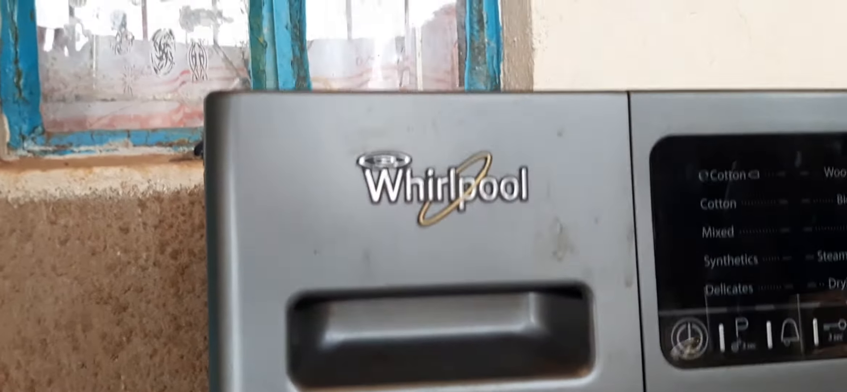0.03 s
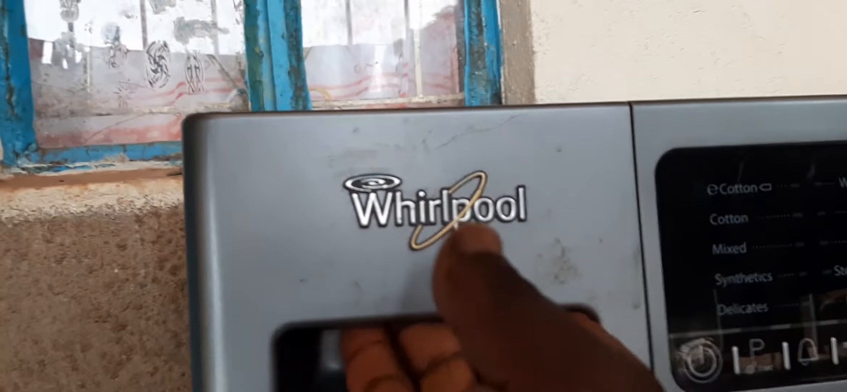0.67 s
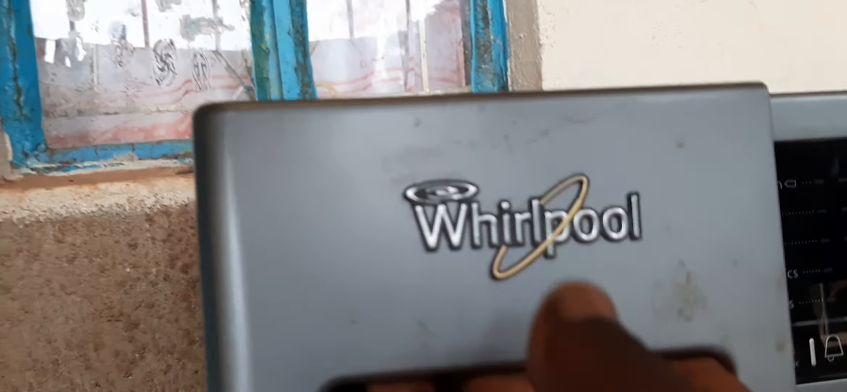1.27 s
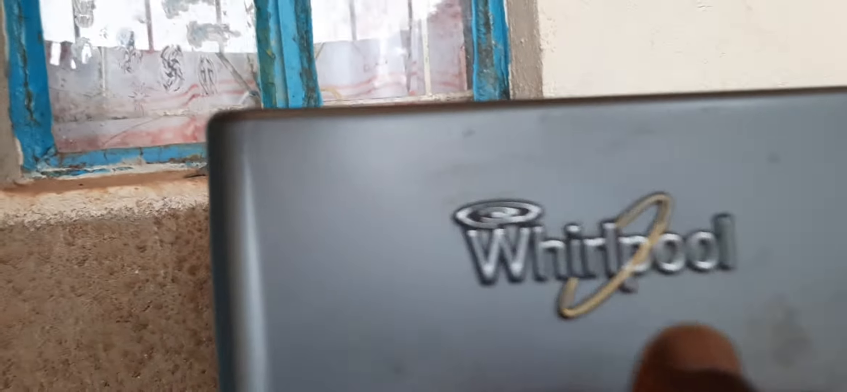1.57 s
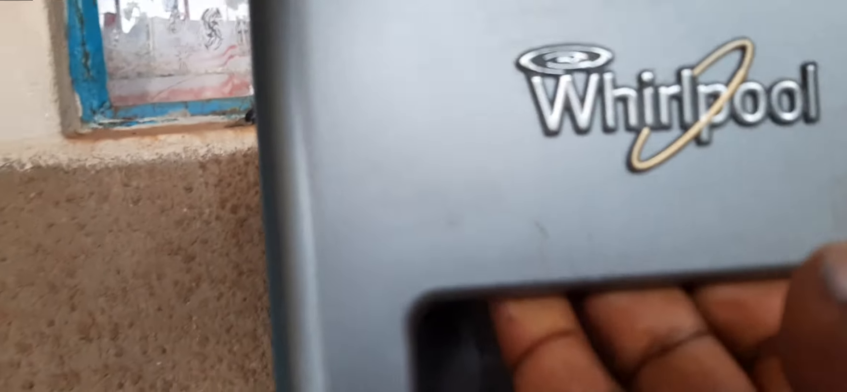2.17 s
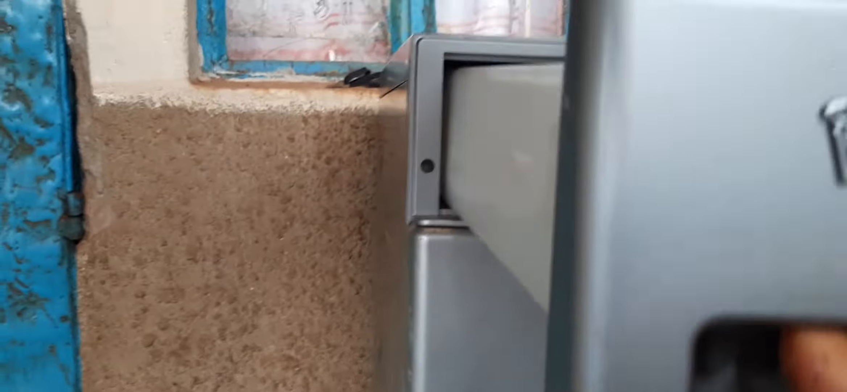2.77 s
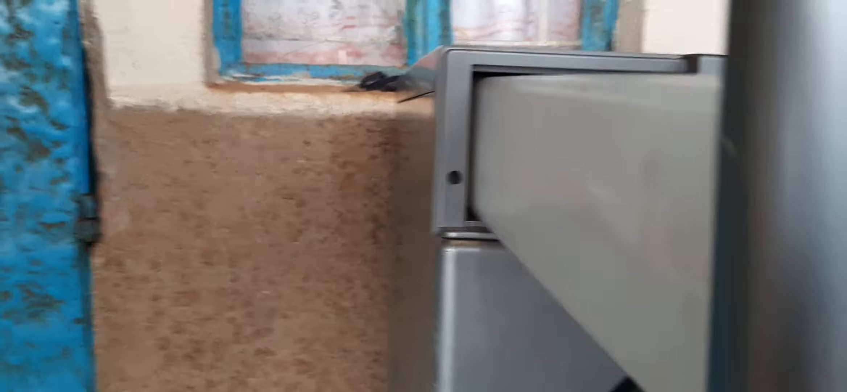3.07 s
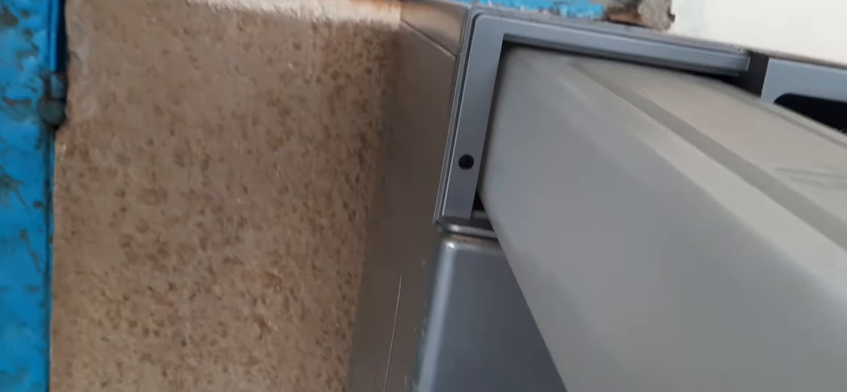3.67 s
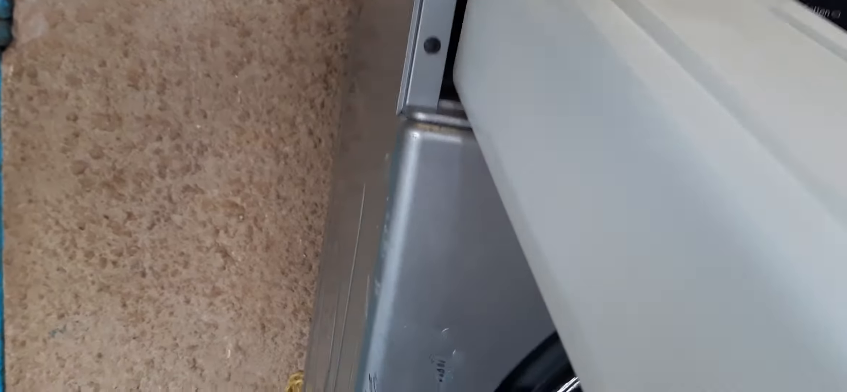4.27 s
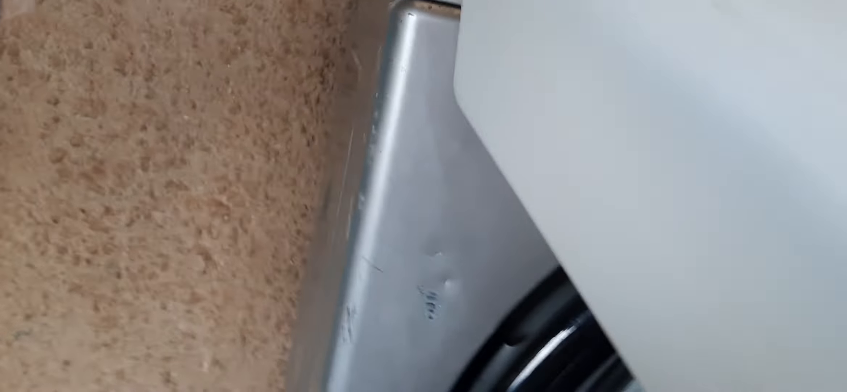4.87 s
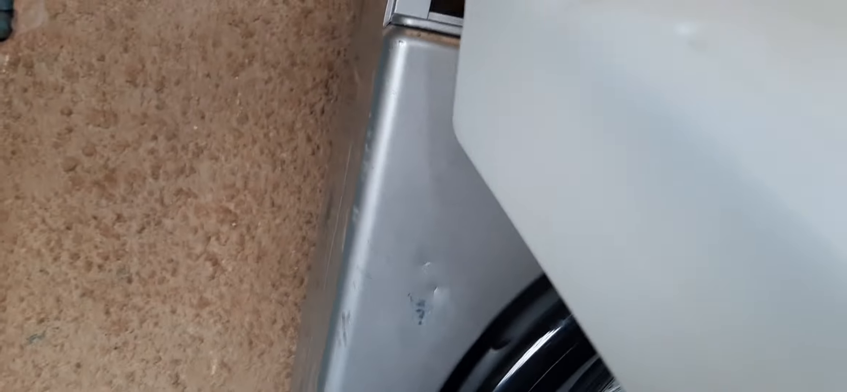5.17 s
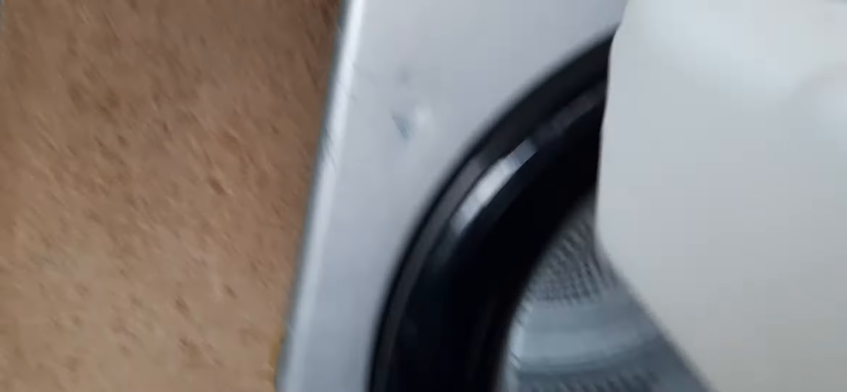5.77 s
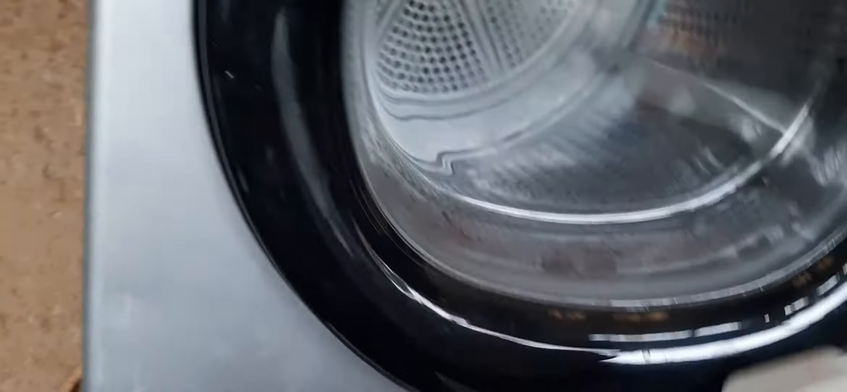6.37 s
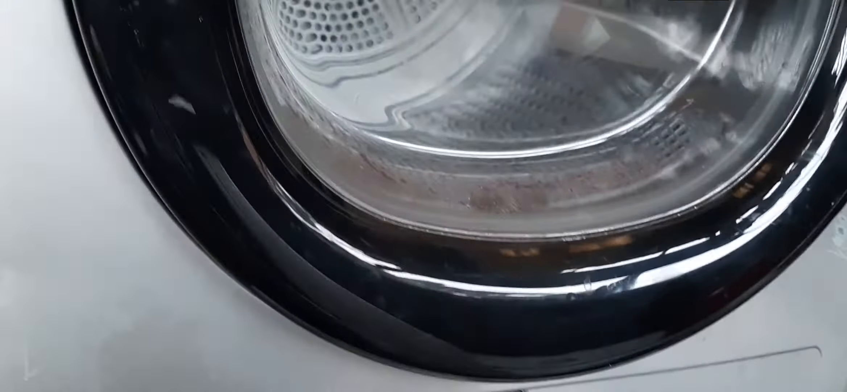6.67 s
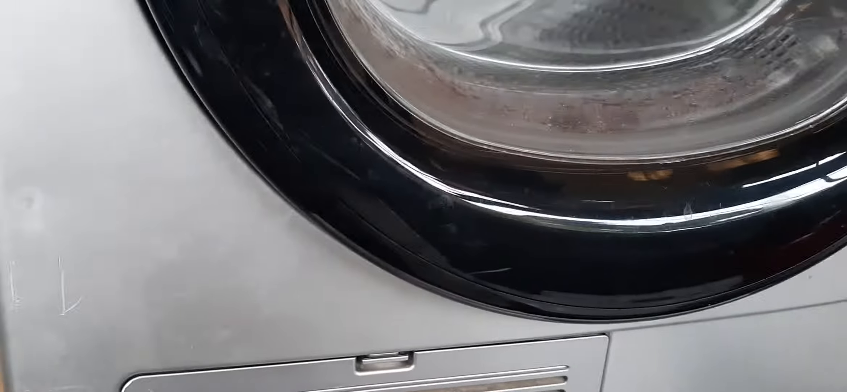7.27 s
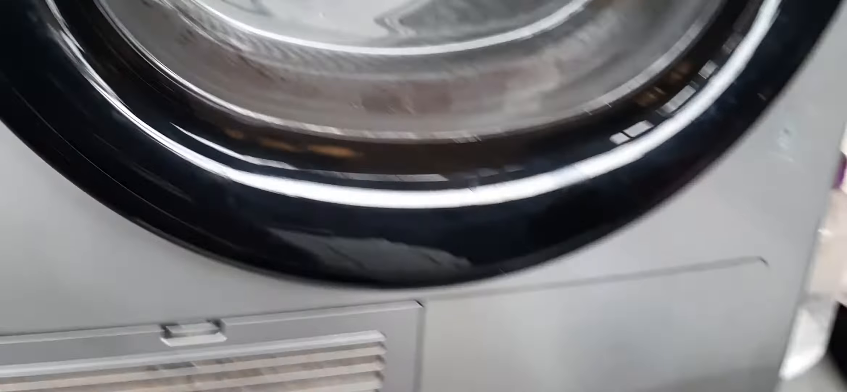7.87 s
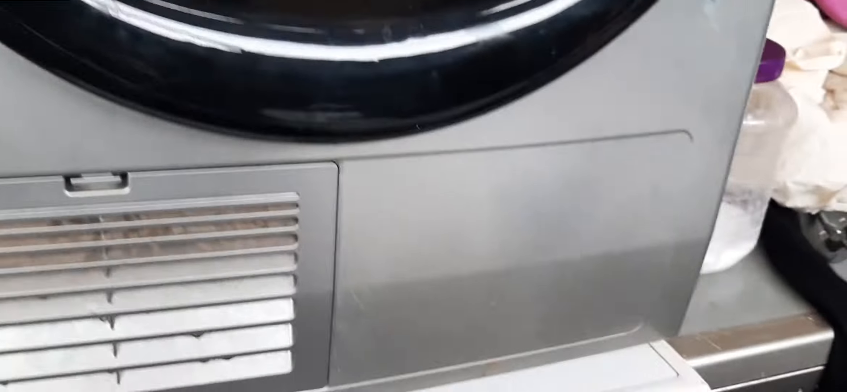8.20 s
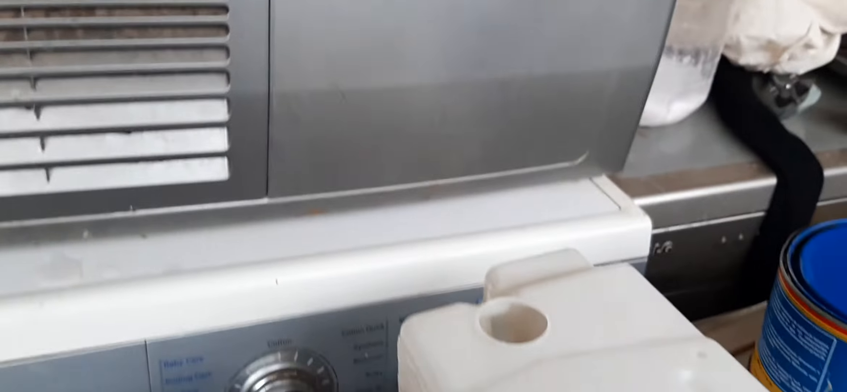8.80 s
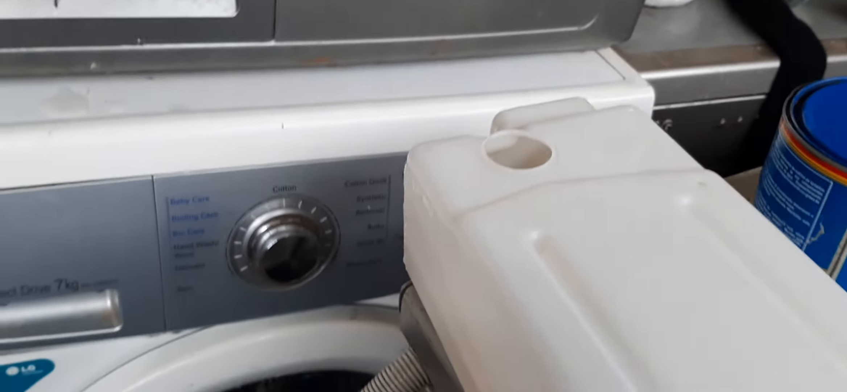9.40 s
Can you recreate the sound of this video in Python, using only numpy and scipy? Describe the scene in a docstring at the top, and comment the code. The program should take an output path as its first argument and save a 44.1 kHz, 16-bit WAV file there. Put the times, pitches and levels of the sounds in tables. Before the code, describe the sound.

A plastic water tank scrapes and knocks out of a dryer, sloshes and spills a little, then lands with a hollow boom.

```python
"""The plastic water tank of a tumble dryer is pulled from its bay in a small, hard-walled room.
First fingertips slip on the handle. Then the tank scrapes along its rails and knocks in the hollow
cabinet; its stop tab snaps over a catch and the thin panels shudder. Next, as it is carried away,
its water sloshes and bubbles, and some splatters on the floor. Last, it is set down with a boom
on the lid of a washing machine, where the water inside sloshes on with a low rumble."""
import sys
import numpy as np
from scipy import signal
from scipy.fft import rfft, irfft
from scipy.io import wavfile

SR = 44100
rng = np.random.default_rng(int(sys.argv[2]) if len(sys.argv) > 2 else 0)


def transcribe(u):
    """Save the signal u as a 16-bit wav file named by the first command-line argument.

    u: samples, shape (n,) or (channels, n), limited to [-1, 1]; the rate is SR.
    q: integer samples, one column per channel.
    """
    v = np.clip(np.atleast_2d(u).T, -1, 1)
    q = np.round(v * 32767).astype(np.int16)
    wavfile.write(sys.argv[1], SR, q)


N = 416304
TIME = np.arange(N) / SR
RING_TIME = np.arange(SR * 3 // 4) / SR  # the clock for one short sound, in seconds

# The tank hits its bay, and later the washer lid.
# Each row: start in seconds, thud level in dB, clack level in dB, brightness in Hz.
BAY_KNOCKS = [(.26, -52.5, -53.5, 2060), (.284, -45, -59.5, 12000), (.46, -57, -47, 1010),
              (.557, -67, -46.5, 1320), (.864, -59, -47.5, 1600), (.937, -54, -35, 1600),
              (.987, -51, -31, 990), (1.099, -58, -35, 1680), (1.6, -50, -32, 1760),
              (1.919, -34, -27.5, 1850), (1.999, -54, -31.5, 1370), (2.07, -62, -33.5, 1210),
              (2.62, -56, -37.5, 5800), (3.619, -20, -21, 2483), (3.652, -13.5, -24, 710),
              (3.741, -22.5, -22, 600), (3.892, -36.5, -61, 588), (4.061, -23.5, -29.5, 900),
              (4.145, -30.5, -63, 600), (4.461, -79.5, -50, 14100), (4.553, -23, -26, 1070),
              (4.569, -19.5, -31, 2540), (4.73, -70, -42.5, 12000), (4.7615, -12, -23, 1302),
              (4.769, -11.5, -21, 600), (4.804, -33, -35.5, 7000), (4.822, -31.5, -36, 2440),
              (4.907, -29.5, -35.5, 700), (4.995, -41, -46, 1460)]
LID_KNOCKS = [(7.953, -27, -25, 2800), (7.958, -21, -20, 1580), (7.967, -12, -22, 873),
              (8.01, -20.5, -31, 1750), (8.602, -36.5, -70, 900), (8.943, -58.5, -50.5, 2510),
              (9.05, -61, -50.5, 9000)]
# The hollow notes (modes) of the tank in its bay and on the lid.
# Each row: pitch in Hz, level in dB, seconds to fade by 60 dB (called t60 below).
BAY_MODES = [(64.4, -18, 1), (87.3, -9.5, 0.63), (110.4, -9.5, 0.31), (128.6, -3.5, 0.39),
             (147.7, -6.5, 0.78), (180, 4.5, 0.14), (224.8, 2, 0.37), (265.4, 0.5, 0.41), (288.3, -5, 0.47),
             (324, -12.5, .25), (369, -12.5, 0.17), (447, -10.5, 0.5), (507, -10, 0.6), (568, -9.5, 0.18),
             (642, -17.5, 0.22), (763, -21, 0.27), (821, -11.5, 0.25)]
LID_MODES = [(84.7, 7.5, 0.62), (130.9, 12, 0.47), (161, 3, 0.23), (242, 14.5, 0.33), (270, 4, 0.31),
             (322, 6.5, 0.38), (374, -2, 0.46), (487, 6.5, 0.28), (635, -10, 0.21), (700, -6.5, 0.3),
             (910, -18, 0.31)]

# Movements that swell and die away.
# Each row: peak time in seconds, rise in seconds, fall in seconds, level in dB.
PANEL_SHUDDERS = [(.31, .03, 0.14, -56.5), (3.68, .08, 0.33, -39), (4.12, 0.12, 0.088, -36.5),
                  (4.78, .3, .44, -34)]  # the tank's weight rocks on the cabinet panels
TUGS = [(.9, 0.048, 0.12, -43.5), (1.08, 0.29, .3, -39.5), (1.54, .2, 0.3, -36.5),
        (2.04, 0.37, 0.42, -40.5), (2.62, .45, .24, -41), (3.0, 0.17, 0.11, -37), (3.26, 0.17, .18, -57),
        (3.63, 0.098, 0.29, -39.5), (3.8, 0.14, 0.074, -42.5), (4.1, 0.12, .13, -44),
        (4.36, 0.18, 0.25, -53), (4.56, 0.099, 0.047, -38), (4.77, 0.27, .13, -38.5),
        (5.21, 0.22, 0.077, -58)]  # the tank slides along its rails
WATER_SWINGS = [(6.19, 0.1, 0.17, -59.5), (6.62, 0.047, 0.058, -50), (6.72, 0.13, 0.12, -45.5),
                (6.95, 0.03, 0.046, -40), (7.04, 0.35, 0.19, -32.5), (7.22, 0.054, 0.14, -48.5)]  # water swings inside the carried tank
GUSHES = [(6.33, .022, .06, -43.5), (6.43, 0.024, 0.042, -51), (6.7, 0.69, 0.52, -57.5),
          (7.39, 0.08, 0.12, -38), (7.55, 0.22, .26, -38)]  # spilled water spatters on the floor
LID_SLOSHES = [(8.42, 0.23, 0.32, -51), (8.62, .02, 0.12, -42.5), (8.98, 0.29, 0.26, -58),
               (9.38, 0.23, 0.25, -65.5)]  # water sloshes in the tank as it stands on the lid

# Fingertips slip in the handle. Each row: start in seconds, length in seconds, level in dB.
FINGER_SLIPS = [(0.437, 0.063, -44), (0.548, .02, -49.5), (0.598, 0.13, -55.5)]
# Single air pockets close in the water. Each row: start in seconds, level in dB, pitch in Hz.
PLOPS = [(6.6133, -42.5, 1500), (6.6417, -43, 2530), (6.6781, -35.5, 1510), (6.69, -37, 2900),
         (6.7403, -41, 1610), (6.782, -35, 3050), (6.8405, -35, 1530), (6.8818, -35, 1530),
         (6.949, -37, 2070), (7.033, -37, 2660), (7.048, -45, 1220), (7.052, -39, 3870),
         (7.1246, -47, 1470), (7.163, -43, 3600), (7.463, -30.5, 2970), (7.683, -32, 3040),
         (8.29, -56.5, 1750), (8.3877, -53, 1580), (8.512, -46, 1610), (8.597, -37, 1505)]
# Drops land. Each row: start in seconds, slap level in dB, ring level in dB, ring pitch in Hz.
DROPS = [(6.422, -68, -48, 4170), (6.685, -48, -42, 4200), (6.772, -62, -48, 3280), (7.3, -50.5, -67, 2000),
         (7.322, -38.5, -55, 5500), (7.3434, -32, -57, 4510), (7.361, -29.5, -33, 3480),
         (7.393, -52, -33, 3750), (7.463, -27, -28, 3360), (7.515, -61, -36, 2700),
         (7.5417, -28, -33, 2800), (7.585, -56, -55.5, 2920), (7.622, -46.5, -41, 4500),
         (7.649, -40, -40, 5300), (7.682, -35.5, -30.5, 3060), (7.712, -42, -70, 2830),
         (8.074, -50, -64.5, 4760), (8.291, -64.5, -67, 4670), (8.485, -53.5, -84, 5000)]

# Pitches that the plastic shell and the room boost.
# Each row: centre in Hz, width in Hz, boost in dB.
SHELL_RESONANCES = [(228, 13, 4), (446, 23, 6.5), (605, 83, 3.5), (859, 92, 2.5), (982, 23, 1),
                    (1509, 100, 3.5), (2100, 39, 0), (2910, 600, 3.5), (4030, 100, 3)]
STANDING_WAVES = [(131, 44, 4), (382, 58, 2.5), (820, 200, 2)]

# A sound's colour is its mix of low and high pitches. Each row: frequency in Hz, gain in dB.
CLACK_COLOUR = [(60, -26.5), (200, 1), (500, -3), (1000, -3), (2000, -0.5), (4000, -6.5), (7000, -9.5),
                (11000, 2), (16000, 4)]  # the thin tank wall
FLEX_COLOUR = [(25, -30.5), (55, -10), (125, -2.5), (260, -3.5), (450, -10), (900, -17.5), (3000, -57)]  # bending panels
SCRAPE_COLOUR = [(29, -50.5), (50, -14.5), (220, -1.5), (371, -7), (433, -8.5), (545, -9.5), (991, -8),
                 (1510, -10), (1730, -19), (2020, -10), (5000, -30), (6500, -58.5), (11000, -120)]  # plastic rubbing on plastic
HISS_COLOUR = [(1500, -23), (3000, -1), (4500, -6), (7000, -3.5), (11000, -8), (16000, -8.5)]  # the fine hiss of that rubbing
GRIP_COLOUR = [(59, -10), (100, -9), (300, -14), (388, -2), (505, -8), (587, 3.5), (1130, -8), (1920, -13),
               (2190, -10.5), (9000, -48), (11700, -73), (19800, -120)]  # fingers on the hollow handle
GURGLE_COLOUR = [(35, -53), (60, -5), (113, -5.5), (237, 1), (471, 0), (642, 1), (1130, 1.5), (1500, 3),
                 (1950, -27), (3300, -120)]  # big bubbles
CHURN_COLOUR = [(400, -10), (1200, -6.5), (1550, -1), (2500, 0.5), (3500, -15), (7000, -16), (14000, -20)]  # the stirred water surface
SPLASH_COLOUR = [(400, -7), (1300, -11), (2500, 0.5), (4500, -2), (7000, 3.5), (11000, 4), (16000, 2)]  # water hitting the floor
RUMBLE_COLOUR = [(24, -36), (40, 4.5), (108, -19), (157, 7), (204, -9), (339, -1), (556, -28.5), (900, -40),
                 (1170, -41), (1980, -120)]  # low sloshing in the tank on the lid
AIR_COLOUR = [(18, -36), (30, -4.5), (141, -0.5), (512, -9.5), (600, -6.5), (988, -16), (1760, -12),
              (2540, -10.5), (2980, -24.5), (3980, -20), (4910, -27.5), (7670, -27), (8520, -29),
              (14400, -19.5), (16000, -13)]  # the steady background
PORT_COLOUR = [(20, 1), (7600, -2), (8600, -8.5), (9600, -9), (11000, 0), (16000, -2)]  # the microphone's small openings (ports)

# Where the tank is heard. Each row: time in seconds, left minus right in dB.
TANK_POSITION = [(0, 0), (3, 1), (3.6, -1), (4.6, -2), (5.2, -0.5), (6.3, 1), (7.9, 1.5), (9.4, 3.5)]
# How each pitch leans to one side. Each row: frequency in Hz, left minus right in dB.
STEREO_BALANCE = [(60, -7), (120, -3), (200, -1), (330, -3), (700, -2), (1300, -1.5), (2400, 8),
                  (4400, -2.5), (8000, 1.5), (15000, 4)]


def knocks(table, modes, clack_t60, wall_db, wall_t60, flex_db, flex_t60):
    """The shell clacks and the body booms. Each hit has its own brightness, from dull to sharp."""
    thuds, clacks = np.zeros(N), np.zeros(N)
    for start, thud_db, clack_db, bright_hz in table:
        strike = burst(clack_t60) + amp(wall_db) * burst(wall_t60)
        clack = colour(strike, CLACK_COLOUR, SHELL_RESONANCES)
        for cutoff_hz in (bright_hz, bright_hz * 1.18):
            clack = signal.lfilter(*signal.butter(1, min(cutoff_hz, SR / 3), fs=SR), clack)
        add(clacks, start, at_level(clack, clack_db))
        # The panels flex in many crowded modes between the strong ones.
        flex = colour(burst(flex_t60), FLEX_COLOUR)
        add(thuds, start, at_level(boom(modes), thud_db) + at_level(flex, thud_db + flex_db))
    return thuds, clacks


def boom(modes):
    """The hollow body rings. Shifting water and the spot struck change its notes a little each time."""
    out = 0
    for k, (hz, db, t60) in enumerate(modes):
        detune, weight = rng.standard_normal(2)
        pitch = hz * (1 + .008 * detune)
        tone = np.sin((2 * np.pi * pitch * RING_TIME).astype(np.float32))
        out = out + (-1) ** k * amp(db + 1.5 * weight) * tone * fade(t60)
    return out


def tab_snap():
    """The tank's stop tab springs over its catch with a hard, bright crack."""
    out = np.zeros(N)
    crack = burst(t60=.024) + amp(-23.5) * burst(t60=.25)
    tab_colour = [(1200, -38), (2600, 0), (4000, -2.5), (6500, -5), (9000, -10), (15000, -14)]
    tab = colour(crack, tab_colour, peaks=[(2900, 350, 8.7), (3840, 300, 4.4)])
    add(out, start=3.618, sound=at_level(tab, db=-19))
    return out


def panel_shudder():
    """The cabinet drums low while the tank rocks on the end of its rails."""
    low_band = signal.butter(2, [52, 95], "band", fs=SR, output="sos")
    drumming = unit(signal.sosfilt(low_band, rng.standard_normal(N)))
    return swells(PANEL_SHUDDERS, steepness=1.6) * drumming


def sliding():
    """Plastic catches and slips on plastic: the shell rings with it, and faster tugs hiss more."""
    speed = swells(TUGS, steepness=1.81)
    catching = flutter(per_s=40, depth_db=2)
    coarse_slips = grains(per_s=2700, spread_db=1.5) * catching
    fine_slips = grains(per_s=17000, spread_db=3) * catching
    scrape = unit(colour(coarse_slips, SCRAPE_COLOUR, SHELL_RESONANCES))
    hiss = unit(colour(fine_slips, HISS_COLOUR))
    return amp(2) * speed * scrape + speed ** 1.263 * hiss


def sloshing():
    """Water churns, and breaking waves fold in bubbles. It laps on after the tank is set down."""
    waves = swells(WATER_SWINGS, steepness=1.82)
    lapping = amp(-30.5) * swells(LID_SLOSHES, steepness=4.8) ** .47
    stir = amp(-16.5) * waves ** .64 + lapping
    breaking = np.minimum(stir / amp(-47), 1)  # gentle stirring makes little froth
    big = bubbles(139.5, 990, cycles=6.3, spread_db=2, count=4000)
    medium = bubbles(900, 3400, cycles=20, spread_db=4.2, count=1800)
    tiny = bubbles(2800, 6500, cycles=30, spread_db=5, count=1000)
    gurgle = unit(colour(big, GURGLE_COLOUR))
    froth = unit(colour(medium + amp(-5) * tiny, CLACK_COLOUR, SHELL_RESONANCES))  # through the wall
    churn = unit(colour(grains(per_s=2400, spread_db=3), CHURN_COLOUR))
    surface = breaking * froth + amp(-7) * churn
    out = amp(-2.5) * waves * gurgle + stir * surface
    for start, db, hz in PLOPS:
        add(out, start, at_level(bubble(hz, cycles=24, glide=.12), db - 2))
    return out


def spill():
    """Drops slap the floor, trap air that rings briefly, and scatter into mist and droplets."""
    out = np.zeros(N)
    spray = swells(GUSHES, steepness=1)
    for start, slap_db, ring_db, hz in DROPS:
        slap = burst(t60=.007) + amp(-19) * burst(t60=.1)
        add(out, start, at_level(colour(slap, SPLASH_COLOUR), slap_db))
        pocket_band = signal.butter(2, [hz / 1.24, min(hz * 1.41, SR / 3)], "band", fs=SR)
        ring = signal.lfilter(*pocket_band, burst(t60=.015))
        add(out, start, at_level(ring, ring_db))
        scatter = envelope(rise_s=.0053, fade_from_s=.0053, t60=.16)
        add(spray, start, amp(slap_db - 15) * scatter)
    mist = unit(colour(grains(per_s=2700, spread_db=1), SPLASH_COLOUR))
    droplets = unit(colour(grains(per_s=45, spread_db=2), SPLASH_COLOUR))
    return out + amp(-1) * spray * (mist + amp(-2) * droplets)


def fingers():
    """Fingertips stutter over the hollow handle."""
    pressure = np.zeros(N)
    for start, length_s, db in FINGER_SLIPS:
        add(pressure, start, amp(db) * envelope(rise_s=.016, fade_from_s=length_s, t60=.39))
    return pressure * unit(colour(grains(per_s=700, spread_db=2.5), GRIP_COLOUR))


def water_rumble():
    """Water sloshes in the tank on the lid with a low rumble."""
    rumble = unit(colour(grains(per_s=540, spread_db=3.5), RUMBLE_COLOUR))
    return swells(LID_SLOSHES, steepness=1.24) * rumble


def room(sound, change_s=1.2):
    """Tank and microphone keep moving, so one pattern of echoes slowly gives way to the next."""
    out = np.zeros((2, N))
    for centre in np.arange(0, N / SR + change_s, change_s):
        here = np.abs(TIME - centre) < change_s
        part = sound[here] * np.cos(np.pi / 2 * (TIME[here] - centre) / change_s)
        for track, tail in zip(out, echoes()):
            add(track, TIME[here][0], signal.fftconvolve(part, tail))
    return out


def echoes(low_t60=.25, high_t60=.23, split_hz=3000, rise_s=.0005):
    """A blur of echoes from plastered walls; the treble dies a little sooner."""
    low, high = (signal.butter(2, split_hz, kind, fs=SR) for kind in ("low", "high"))
    mid, side = (signal.lfilter(*low, burst(low_t60)) + signal.lfilter(*high, burst(high_t60))
                 for _ in range(2))
    onset = 1 - np.exp(-(RING_TIME / rise_s) ** 2)
    tail = stereo(mid, side, apart_hz=231.2) * onset
    return tail / np.sqrt(np.sum(tail ** 2) / 2)


def air():
    """The faint, steady noise of the room and the microphone."""
    mid, side = (colour(rng.standard_normal(N), AIR_COLOUR) for _ in range(2))
    return amp(-65) * unit(stereo(mid, side, apart_hz=600))


def bubble(hz, cycles, glide):
    """An air pocket rings briefly and rises in pitch as it nears the surface."""
    age = np.arange(int(cycles * SR / hz)) * hz / (cycles * SR)  # runs from 0 to 1
    return np.sin(2 * np.pi * cycles * age * (1 + glide * age / 2)) * np.exp(-np.log(300) * age)


def bubbles(low_hz, high_hz, cycles, spread_db, count):
    """A cloud of bubbles with random times, pitches and strengths."""
    out = np.zeros(N)
    for when, pitch, life, size in rng.random((count, 4)):
        hz = low_hz * (high_hz / low_hz) ** pitch
        gain = amp(-spread_db * np.log(max(size, .03)))
        add(out, when * N / SR, gain * bubble(hz, cycles * (.5 + life), glide=.25))
    return unit(out)


def grains(per_s, spread_db):
    """Tiny random impacts of unequal size."""
    size = amp(spread_db * np.minimum(rng.exponential(size=N), 5))
    return (rng.random(N) < per_s / SR) * size * rng.choice([-1, 1], N)


def burst(t60):
    """A dense vibration: noise that dies away."""
    return rng.standard_normal(len(RING_TIME)) * fade(t60)


def swells(table, steepness):
    """Each movement speeds up from rest, peaks and stops again; overlapping ones add in power."""
    power = np.zeros(N)
    for peak, rise_s, fall_s, db in table:
        moving = (TIME > peak - rise_s) & (TIME < peak + fall_s)
        progress = np.interp(TIME[moving], [peak - rise_s, peak, peak + fall_s], [0, .5, 1])
        power[moving] += (amp(db) * np.abs(np.sin(np.pi * progress)) ** steepness) ** 2
    return np.sqrt(power)


def flutter(per_s, depth_db):
    """A level that wobbles at random."""
    knots = rng.standard_normal(N // 100)
    return amp(depth_db * np.interp(TIME * per_s, np.arange(len(knots)), knots))


def envelope(rise_s, fade_from_s, t60):
    """A level that rises, holds and then fades."""
    fading_s = np.maximum(RING_TIME - fade_from_s, 0)
    return np.minimum(RING_TIME / rise_s, 1) * np.exp(-np.log(1000) * fading_s / t60)


def fade(t60):
    """A level that falls by 60 dB every t60 seconds."""
    return np.exp(-np.log(1000) * RING_TIME / t60)


def colour(sound, points, peaks=(), size=8192):
    """Filter a sound along a curve of (Hz, dB) points, plus peaks of (Hz, width in Hz, dB)."""
    hz = np.maximum(np.fft.rfftfreq(size, 1 / SR), 1)
    point_hz, point_db = np.transpose(points)
    db = np.interp(np.log(hz), np.log(point_hz), point_db)
    db += sum(boost / (1 + (2 * (hz - centre) / width) ** 2) for centre, width, boost in peaks)
    # Fold the filter so that it rings only after a hit, never before it.
    cepstrum = irfft(db * np.log(10) / 20)
    cepstrum[1:size // 2] *= 2
    cepstrum[size // 2 + 1:] = 0
    response = irfft(np.exp(rfft(cepstrum)))[:size // 2]
    return signal.oaconvolve(sound, response)[:len(sound)]


def stereo(mid, side, apart_hz):
    """Two close microphone ports hear the same bass but unrelated treble."""
    side = signal.lfilter(*signal.butter(1, apart_hz, "high", fs=SR), side)
    return np.array([mid + side, mid - side]) / np.sqrt(2)


def amp(db):
    """Turn decibels into a gain."""
    return 10 ** (np.asarray(db) / 20)


def unit(sound):
    """Scale a sound to an average (rms) level of 1."""
    return sound / np.sqrt(np.mean(sound ** 2))


def at_level(sound, db):
    """Give a short sound the energy of this level held for 20 ms."""
    return sound * amp(db) * np.sqrt(.02 * SR / np.sum(sound ** 2))


def add(track, start, sound):
    """Mix a sound into the track at a start time in seconds."""
    first = max(int(start * SR), 0)
    part = sound[:max(N - first, 0)]
    track[first:first + len(part)] += part


def scene():
    """Mix the tank and its water with the room's echoes and background, in stereo."""
    bay_thuds, bay_clacks = knocks(BAY_KNOCKS, BAY_MODES, clack_t60=.034,
                                   wall_db=-15, wall_t60=.22, flex_db=-4, flex_t60=.25)
    lid_thuds, lid_clacks = knocks(LID_KNOCKS, LID_MODES, clack_t60=.052,
                                   wall_db=-28.5, wall_t60=.53, flex_db=-4.5, flex_t60=.36)
    thuds = bay_thuds + lid_thuds + panel_shudder()
    near = bay_clacks + lid_clacks + tab_snap() + sliding() + fingers()
    near = near + sloshing() + spill() + water_rumble()
    direct = amp(-3) * near + amp(-4.5) * thuds
    # The tank is a little to the right, so its direct sound reaches the left port late.
    ports = np.array([np.interp(TIME - .0002, TIME, direct), direct])
    walls = room(amp(-4) * near + amp(-11.5) * thuds)
    pan_db = np.interp(TIME, *np.transpose(TANK_POSITION))
    panned = (ports + walls) * amp(np.array([pan_db, -pan_db]) / 2)
    channels = []
    for channel, sign in zip(panned, (1, -1)):
        balance = [(hz, sign * db / 2) for hz, db in STEREO_BALANCE]
        channels.append(colour(channel, balance, STANDING_WAVES))
    return np.array(channels) + air()


def record(dry):
    """The microphone ports put a dip in the treble; the deepest bass and the very top are cut."""
    notched = np.array([colour(channel, PORT_COLOUR) for channel in dry])
    bass_cut = signal.butter(4, 46, "high", fs=SR, output="sos")
    top_cut = signal.ellip(10, .2, 80, 16000, fs=SR, output="sos")
    return signal.sosfilt(top_cut, signal.sosfilt(bass_cut, notched))


dry = scene()
out = record(dry)
transcribe(out)
```